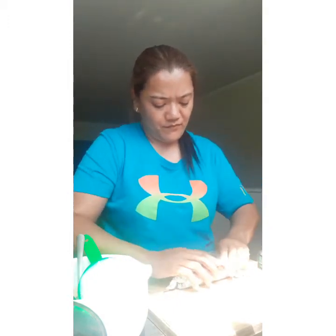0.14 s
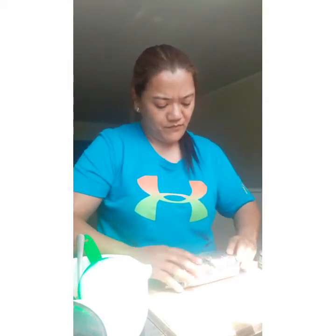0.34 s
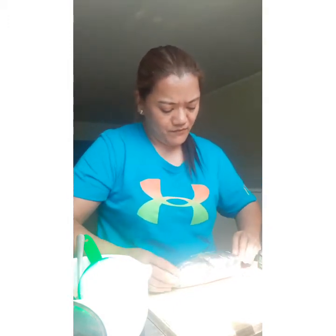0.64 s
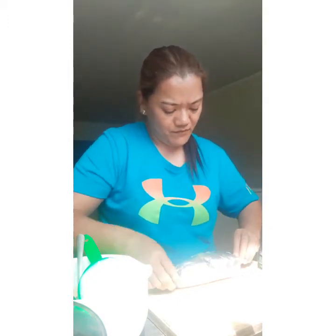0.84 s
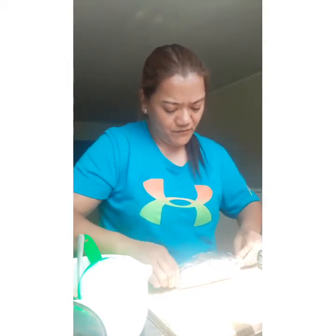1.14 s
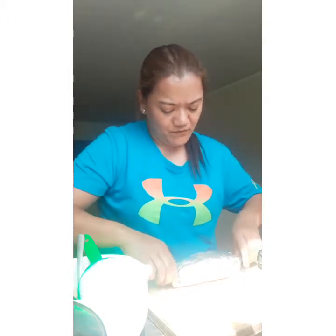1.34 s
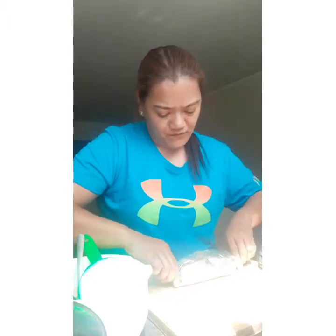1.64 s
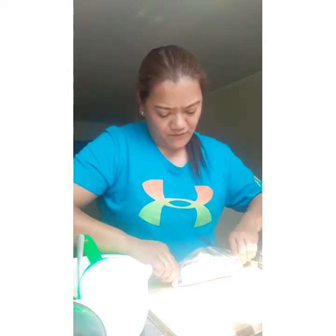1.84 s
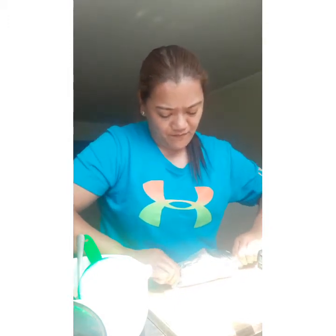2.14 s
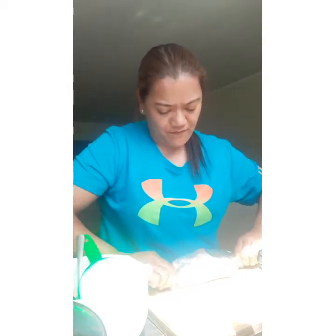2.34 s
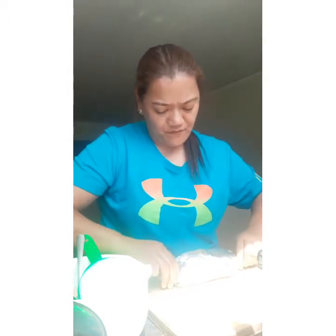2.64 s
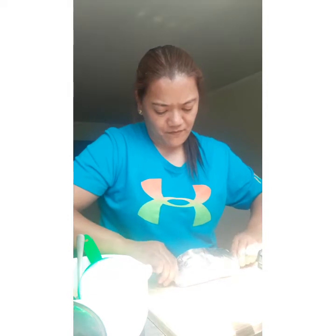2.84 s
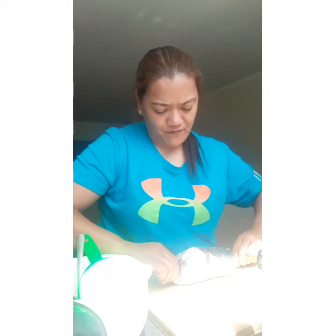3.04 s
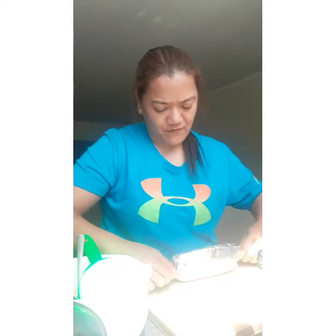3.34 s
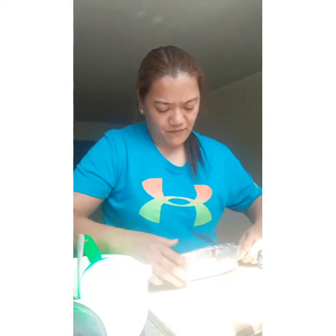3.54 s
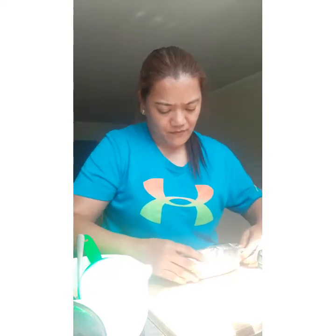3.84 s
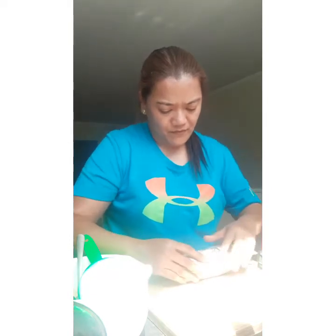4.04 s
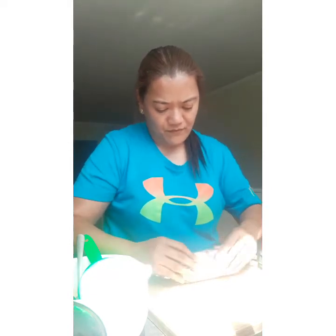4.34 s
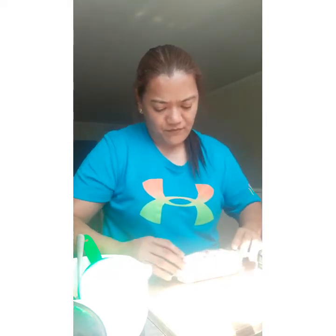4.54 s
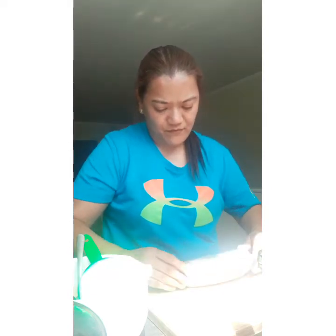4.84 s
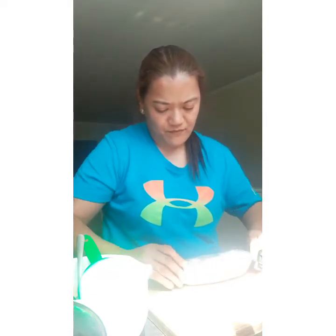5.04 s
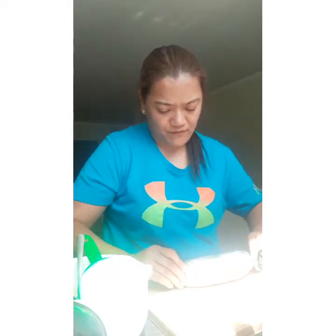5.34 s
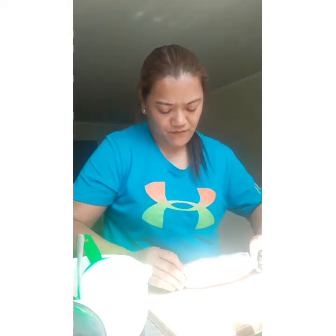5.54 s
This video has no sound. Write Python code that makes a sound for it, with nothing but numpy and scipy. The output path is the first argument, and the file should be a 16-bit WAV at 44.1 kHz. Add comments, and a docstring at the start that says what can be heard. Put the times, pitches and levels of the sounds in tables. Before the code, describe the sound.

Hands wrap a roll in aluminium foil at a kitchen table, heard very close. Light crinkles and a short airy slide open it, then scattered snaps. Stronger crackling with dull bumps comes around two to three seconds, a brief lull follows, then creases snap more and more densely to the end. A small hard room adds a short tail; a low fan hum wavers underneath.

```python
"""At a kitchen table, heard close up, hands fold and press aluminium foil around a roll.
Creases snap, facets ping and wrinkles crackle: bursts of clicks shaped by the foil, and short rings.
Fingers slide with an airy hiss of shaped noise; the roll bumps the table in dull bursts and scuffs on it.
The small hard room answers with fading noise. A fan hums with a wavering tone over a low rush of noise,
which swells with the scuffs. Faint treble noise, opposite in the two channels, follows the snaps."""
import sys
import numpy as np
from scipy import signal
from scipy.fft import rfft, irfft, next_fast_len
from scipy.io import wavfile
from scipy.ndimage import uniform_filter1d

SR = 44100
rng = np.random.default_rng(int(sys.argv[2]) if len(sys.argv) > 2 else 0)


def transcribe(u):
    """Save the signal u as a 16-bit wav file named by the first command-line argument.

    u: samples, shape (n,) or (channels, n), limited to [-1, 1]; the rate is SR.
    q: integer samples, one column per channel.
    """
    v = np.clip(np.atleast_2d(u).T, -1, 1)
    q = np.round(v * 32767).astype(np.int16)
    wavfile.write(sys.argv[1], SR, q)


N = 250929
TIME = np.arange(N) / SR


def amp(db):
    """Turns decibels into a plain multiplier."""
    return 10 ** (np.asarray(db) / 20)


def evened(x):
    """Scales a sound to an average (rms) strength of one."""
    return x / np.sqrt(np.mean(x ** 2) + 1e-20)


def read(points, hz):
    """Reads a table's value at any frequency, on a log axis."""
    f, value = np.transpose(points)
    return np.interp(np.log(hz + 1), np.log(f + 1), value)


def follow(rows):
    """Joins the rows of a table into a curve over time, sample by sample."""
    return np.interp(TIME, *np.transpose(rows))


def add(mix, s, sound):
    """Adds a sound into the mix from second s on, cut off at the end."""
    part = mix[max(round(s * SR), 0):][:len(sound)]
    part += sound[:len(part)]


def tint(x, points):
    """Colours a long sound with a smooth spectrum."""
    size = next_fast_len(N + 4096)
    gains = amp(read(points, np.fft.rfftfreq(size, 1 / SR)))
    return irfft(rfft(x, size) * gains, size)[:N]


def wander(per_s):
    """A random drift of about unit size: straight lines between per_s random values a second."""
    return np.interp(TIME * per_s, np.arange(N), rng.standard_normal(N))


def spectra(x, size):
    """Band frequencies and the short-time power in each."""
    hz, _, z = signal.stft(x, SR, nperseg=size, noverlap=size - size // 4)
    return hz, abs(z) ** 2


def diffuse(power, size):
    """Noise with this short-time power in each band, its phases random."""
    z = np.sqrt(power) * np.exp(2j * np.pi * rng.random(power.shape))
    return 2 * signal.istft(z, nperseg=size, noverlap=size - size // 4)[1][:N]


def causal(db):
    """The response with these gains that rings only after the blow (minimum phase)."""
    cepstrum = irfft(np.log(amp(db)))
    half = len(cepstrum) // 2
    cepstrum[1:half] *= 2
    cepstrum[half + 1:] = 0
    return np.exp(rfft(cepstrum))


# slow drift of the fan tone: start_s, level_db
HUM = [(0, -40.5), (1.4, -40.5), (2.1, -44.5), (2.9, -44), (3.25, -52), (4, -42.5), (4.17, -48.5),
       (4.42, -38), (4.85, -54.5), (5.69, -45.5)]
# partials of the fan tone, before the whole tone is levelled: multiple of HUM_HZ, level_db
HUM_PARTIALS = [(.5,-32),(1,-0.5),(2,-21.5)]
HUM_HZ = 172.6
# eddies that beat against the tone: level, and new random values per second
EDDY_DB, EDDY_PER_S = -48.5, 14


def fan_hum():
    """The fan's wavering blade tone, a sum of sine partials."""
    # eddies jostle the tone in phase and in strength
    turns = HUM_HZ * TIME + .03 * wander(per_s=12)
    tone = sum(amp(db) * np.sin(2 * np.pi * (k * turns + rng.random())) for k, db in HUM_PARTIALS)
    jostle = wander(EDDY_PER_S) + 1j * wander(EDDY_PER_S)
    eddies = (jostle * np.exp(2j * np.pi * turns)).real
    return amp(follow(HUM)) * evened(tone) + amp(EDDY_DB) * evened(eddies)


# colour of the low rush, before it is levelled: pitch_hz, level_db
RUSH_COLOUR = [(20,-49),(40,-23),(60,-8),(110,-3.5),(150,3),(200,0.5),(260,-3.5),(350,-2.5),(480,-13.5),(650,-14.5),(850,-11),(1300,-22),(2800,-28),(5000,-24.5),(8500,-33),(10000,-45),(15500,-40)]
# level of the low rush: steady air, with swells where the roll scuffs on the table,
# before gain_db is added: start_s, level_db
RUSH = [(0.0, -51.5), (2.16, -49), (2.22, -46), (2.31, -53), (2.52, -49.5), (2.63, -51.5), (2.76, -46),
        (3.03, -51), (5.12, -51), (5.21, -49.5), (5.69, -50.5)]


def rush(gain_db=3.5):
    """Coloured noise for the fan's steady air, swelling where the roll scuffs on the table."""
    noise = evened(tint(rng.standard_normal(N), RUSH_COLOUR))
    return amp(follow(RUSH) + gain_db) * noise


# how long the kitchen rings: pitch_hz, time to fall by 60 dB in s
KITCHEN = [(300,1),(1500,0.35),(5000,0.4),(9000,0.33),(15000,0.21)]
# what the walls give back, before tail_db is added: pitch_hz, level_db
WALLS = [(300,1.5),(8500,-4),(10000,-7),(15000,-6)]


def kitchen(x, tail_db=-7):
    """The room stores the sound in each band and lets it die away as noise."""
    hz, power = spectra(x, size=512)
    # share of the power left after each step of 128 samples
    keep = amp(-120 * 128 / SR / read(KITCHEN, hz))
    # the room starts to answer four steps late
    stored = np.array([signal.lfilter([0, 0, 0, 0, 1 - k], [1, -k], band) for k, band in zip(keep, power)])
    walls = amp(read(WALLS, hz))[:, None] ** 2
    return amp(tail_db) * diffuse(stored * walls, size=512)


# resonances of the wrapped roll: pitch_hz, width_hz, level_db
ROLL = [(732,66,-0.5),(1405,31,4.5),(1655,33,2.5),(1903,14,1),(2332,33,-6),(2655,30,-0.5),(3440,47,-15)]
# how unevenly a facet rings: size of its random peaks and valleys, and their spacing
FACET_DB, FACET_HZ = 5, 400


def buckle(colour, decay, shade=((1000, 0), (16000, 0)), echo_db=-13, echo_s=0.016, size=4096):
    """A quick avalanche of tiny clicks rings one facet and the roll; total energy one."""
    t, hz = np.arange(size) / SR, np.fft.rfftfreq(size, 1 / SR)
    decay = max(decay, .0006)  # seconds
    # the clicks come in uneven clumps of eight samples
    clumps = np.repeat(rng.standard_normal(size // 8), 8)
    clicks = rng.standard_normal(size) * amp(3.5 * clumps)
    # the table and hands scatter each click for a moment longer
    fade = np.exp(-t / decay) + amp(echo_db) * np.exp(-t / echo_s)
    clicks *= fade * (1 - np.exp(-t / (0.27 * decay)))
    # every facet has its own size, so its own peaks and valleys
    facet = np.interp(hz / FACET_HZ, np.arange(size), np.clip(rng.standard_normal(size), -2, 2))
    roll = 1 + sum(amp(db) / (1 + (2 * (hz - f) / width) ** 2) for f, width, db in ROLL)
    gain_db = read(colour, hz) + read(shade, hz) + FACET_DB * facet
    sound = irfft(rfft(clicks) * causal(gain_db + 20 * np.log10(roll)))
    return sound / np.linalg.norm(sound)


# the roll and fingers bump the table, before gain_db is added: start_s, level_db
BUMPS = [(0.66, -36), (1.917, -34), (2.025, -35), (2.188, -32), (2.45, -29.5), (2.926, -27.5), (3.138, -32),
         (4.698, -51), (4.892, -37), (5.231, -35)]
# colour of a bump, before it is scaled: pitch_hz, level_db
BUMP = [(60,-57),(200,-23),(500,-1.5),(800,1.5),(1500,-24),(4000,-65)]


def bumps(gain_db=11):
    """Soft, dull knocks of the roll on the table, each a low-coloured burst of clicks."""
    out = np.zeros(N)
    for s, db in BUMPS:
        add(out, s, amp(db + gain_db) * buckle(BUMP, decay=.014))
    return out


# fingers sliding along the sheet: start_s, length_s, level_db
STROKES = [(0.02,0.54,-52.5),(0.488,0.049,-40)]


def strokes():
    """Skin slips over the metal in catches too small to tell apart: an airy hiss."""
    out = np.zeros(N)
    hiss = evened(tint(np.diff(rng.laplace(size=N + 1)), FOIL))
    for s, length, db in STROKES:
        swell = signal.windows.tukey(round(abs(length) * SR))
        add(out, s, amp(db) * swell)
    return out * hiss


# the fingers press the sheet, before crinkle's levels are added:
# start_s, length_s, effort_db, dull flexing relative to the effort in dB
PRESSES = [(0.047, .04, -43, -16), (0.08, 0.097, -42.5, -4), (0.227, .19, -45, -7), (0.65, 0.066, -45.5, 4),
           (.77, 0.096, -49, -3), (0.962, 0.022, -35, -8), (1.052, 0.1, -43.5, -2),
           (1.259, 0.022, -44, 1.5), (1.402, 0.052, -40.5, -7), (1.765, .2, -42, -5.5),
           (2.156, 0.067, -32.5, -5), (2.211, 0.038, -34.5, -2), (2.356, 0.09, -44.5, -7),
           (2.59, 0.045, -41, -9), (2.694, 0.15, -53, 7.5), (2.861, 0.18, -43.5, 0.5),
           (3.063, 0.12, -46.5, 2), (3.383, 0.021, -52, 2), (3.718, 0.068, -42, -5.5),
           (3.85, 0.17, -60, 10), (4.121, 0.17, -39, -4.5), (4.338, .04, -33, -10.5),
           (4.422, 0.047, -40.5, -8), (4.633, 0.098, -45.5, 0), (4.764, 0.068, -35, -3),
           (4.857, 0.15, -52, 3.5), (5.178, 0.071, -36, -6), (5.289, 0.05, -33.5, -6),
           (5.385, 0.36, -38, -3)]
# a press builds quickly, eases while it is held and dies away as the foil settles
PRESS_ATTACK_S, PRESS_SAG_DB, PRESS_RELEASE_S = 0.022, -0.5, 0.031
# between presses the resting hands barely stir the sheet (also before crinkle's levels)
REST_FINE_DB, REST_FLEX_DB = -63, -65


def hands():
    """How hard the fingers work the wrinkles and the layers: presses add up as power."""
    fine, flex = amp(REST_FINE_DB) ** 2, amp(REST_FLEX_DB) ** 2
    for start, length, db, flex_db in PRESSES:
        t = TIME - start
        attack = np.clip(t / PRESS_ATTACK_S + .5, 0, 1)  # halfway up at the start time
        held = attack * amp(db + PRESS_SAG_DB * np.clip(t / length, 0, 1))
        press = held * np.exp(-np.maximum(t - length, 0) / PRESS_RELEASE_S)
        fine = fine + press ** 2
        flex = flex + (press * amp(flex_db)) ** 2
    return np.sqrt(fine), np.sqrt(flex)


def crackle(colour, per_s, spread_db, decay, count=48):
    """A stream of small buckles of uneven size, spread over facets that are duller or brighter."""
    chance, sizes, facet = rng.random(N), rng.exponential(1, N), rng.integers(0, count, N)
    train = (chance < per_s / SR) * amp(spread_db * np.minimum(sizes, 3))
    # the fingers release their energy at a fairly even pace
    train /= np.sqrt(abs(uniform_filter1d(train ** 2, size=SR // 10)) + 1e-4)
    out = np.zeros(N)
    for k in range(count):
        # random dB at four pitches makes this facet duller or brighter
        shade = np.c_[np.geomspace(1500, 12000, 4), 3.5 * rng.standard_normal(4)]
        out += signal.oaconvolve(train * (facet == k), buckle(colour, decay, shade))[:N]
    return out


# colour of the fine wrinkles, before scaling: pitch_hz, level_db
WRINKLE = [(400,-27),(1500,-13),(3200,-8),(4700,0),(5600,0),(7000,-4),(8700,-3.5),(10000,-14),(12500,-8),(15700,-10)]
# colour of the flexing layers, before scaling: pitch_hz, level_db
FLEX = [(200,-0.5),(600,-2.5),(1400,7.5),(2400,6.5),(4000,6.5),(9000,-20.5)]


def crinkle(fine_db=-1, flex_db=-5):
    """Fine wrinkles crackle under the fingers while the layers flex and rub."""
    fine = crackle(WRINKLE, per_s=180, spread_db=7, decay=.0015)
    flex = crackle(FLEX, per_s=200, spread_db=3.5, decay=.005)
    on_wrinkles, on_layers = hands()
    return fine * on_wrinkles * amp(fine_db) + flex * on_layers * amp(flex_db)


# taut facets that ring briefly, before gain_db is added: start_s, level_db, pitch_hz
PINGS = [(0.374,-43,1394),(.608,-30.5,6370),(1.269,-45,1620),(1.947,-31,4900),(1.971,-41,1640),(4.353,-25.5,3260),(4.484,-35,2030),(4.966,-30,5930),(5.008,-33.5,5030),(5.049,-38,5400),(5.404,-25.5,2320)]


def pings(gain_db=-3, cycles=14):
    """A taut facet flips and rings on a cluster of three modes, fading over some cycles."""
    out, t = np.zeros(N), np.arange(SR // 10) / SR
    for s, db, hz in PINGS:
        ring = sum(np.sin(2 * np.pi * (hz * ratio * t + rng.random())) for ratio in (.92, 1, 1.07))
        shape = np.exp(-hz * t / cycles) * (1 - np.exp(-hz * t / 2))
        add(out, s, amp(db + gain_db) * ring * shape)
    return out


# large creases that buckle, before gain_db is added: start_s, level_db, low body_db, top fizz_db
# (body and fizz count by how far they lie from the table's middle value)
SNAPS = [(0.0981, -20.5, -31, -26), (0.1348, -32, -12, -42), (0.17, -23.5, -27, -15),
         (0.2872, -28.5, -37, -37), (0.4665, -32, -20, -34), (0.608, -30.5, -36, -9),
         (0.7091, -28, -29, -15), (0.838, -31.5, -32, -13), (0.9828, -24, -39, -18),
         (1.0644, -29, -15.5, -19), (1.1258, -28, -3, -2), (1.4175, -25, -14, -14), (1.6853, -21, -26, -12),
         (1.7427, -25.5, -16, -8.5), (1.831, -21, -23, -12), (2.026, -19, -20, -13),
         (2.0474, -20, -28, -12), (2.1622, -23.5, -17, -10), (2.1805, -19.5, -13, -3.5),
         (2.2053, -21, -20, -32), (2.3777, -29.5, -22, -9), (2.402, -29, -20, -15),
         (2.4607, -29, -15.5, -20), (2.5983, -30.5, -51, -11), (2.798, -24.5, -21, -21),
         (2.8867, -24.5, -6, -6), (2.9236, -11.5, -21, -12), (3.0849, -24.5, -28, -16),
         (3.1115, -24.5, -17, -12.5), (3.391, -30, -31, -38), (3.4171, -27.5, -22, -17),
         (3.7537, -17, -19, -6.5), (3.8543, -25.5, -25, -15), (3.8643, -21, -21, -21),
         (3.9426, -28, -35, -14), (3.9599, -20, -24, -16), (4.0373, -23.5, -29, -8.5),
         (4.0974, -19, -26.5, -21), (4.1154, -22, -29, -14), (4.1808, -26, -19, -24),
         (4.2403, -19.5, -29, -23), (4.3518, -21, -12.5, -11), (4.434, -24.5, -36, -9),
         (4.4837, -25.5, -25, -15), (4.6533, -23, -18, -11), (4.6981, -17.5, -20, -11),
         (4.773, -24, -24, -14), (4.7864, -17.5, -29, -12), (4.811, -18, -23, -15), (4.8334, -29, -26, -11),
         (4.9278, -27, -20, -12), (5.1996, -19, -27, -14), (5.22, -16, -26, -12), (5.255, -18.5, -20, -4),
         (5.3123, -22, -14, -9), (5.4051, -21.5, -18, -11), (5.465, -20, -21, -15),
         (5.5027, -21.5, -16, -10), (5.5407, -20, -19, -14.5), (5.5787, -22, -6.5, -3),
         (5.6018, -17, -10.5, -8)]
# colour of a buckling crease and of the strokes, before scaling: pitch_hz, level_db
FOIL = [(200,-30),(600,-16),(1200,-11),(2300,-6.5),(3200,-6.5),(4100,-3),(4700,2),(5900,1),(7000,-3.5),(8600,-2),(10200,-14.5),(12300,-7.5),(13600,-8),(14700,-6),(15700,-9)]
# fading time of a usual snap, its random spread in octaves, and octaves longer per dB louder
SNAP_DECAY_S, SNAP_SPREAD_OCT, SNAP_OCT_PER_DB = .0036, .2, 0.12


def snaps(gain_db=15, body_db=-1, fizz_db=0, second_db=-5, crack_db=-8):
    """The large creases give way one by one; wide ones have more body, stiff ones more fizz."""
    out = np.zeros(N)
    usual_db, usual_body, usual_fizz = np.median(SNAPS, axis=0)[1:]
    for (s, db, body, fizz), speed in zip(SNAPS, rng.standard_normal(len(SNAPS))):
        decay = SNAP_DECAY_S * 2 ** (SNAP_SPREAD_OCT * speed + SNAP_OCT_PER_DB * (db - usual_db))
        low_db = body - usual_body + body_db
        top_db = fizz - usual_fizz + fizz_db
        shade = [(700, body_db), (1400, low_db), (2400, low_db), (4500, 0.013), (7000, 0), (11000, top_db)]
        level_db = db + gain_db
        add(out, s, amp(level_db) * buckle(FOIL, decay, shade))
        # the first flip is a hard crack
        add(out, s + decay / 2, amp(level_db + crack_db) * buckle(FOIL, decay / 10, shade, echo_db=-22))
        # the neighbouring facet follows a moment later
        later = s + decay * (1 + rng.random())
        add(out, later, amp(level_db + second_db) * buckle(FOIL, decay / 2, shade))
    return out


# level of an added stereo noise that follows the snaps: pitch_hz, level relative to the snaps in dB
SIDE_NOISE = [(3300,-46),(4800,-16),(14000,-13)]


def side_noise(creases):
    """Faint treble noise, opposite in the two channels, that follows the snaps."""
    hz, power = spectra(creases, size=128)
    return diffuse(power * amp(read(SIDE_NOISE, hz))[:, None] ** 2, size=128)


def scene():
    """Everything is straight ahead, plus a faint treble noise that is opposite in the two channels."""
    creases = snaps()
    near = creases + crinkle() + strokes() + pings() + bumps()
    mid = near + kitchen(near) + fan_hum() + rush()
    side = side_noise(creases)
    return np.array([mid + side, mid - side])


EDGE_HZ = 15850


def record(dry):
    """The recorder's band limit: a low-pass filter removes the highest treble."""
    lowpass = signal.firwin(401, EDGE_HZ, window=("kaiser", 8), fs=SR)
    return signal.oaconvolve(dry, lowpass[None], "same")


dry = scene()
out = record(dry)
transcribe(out)
```